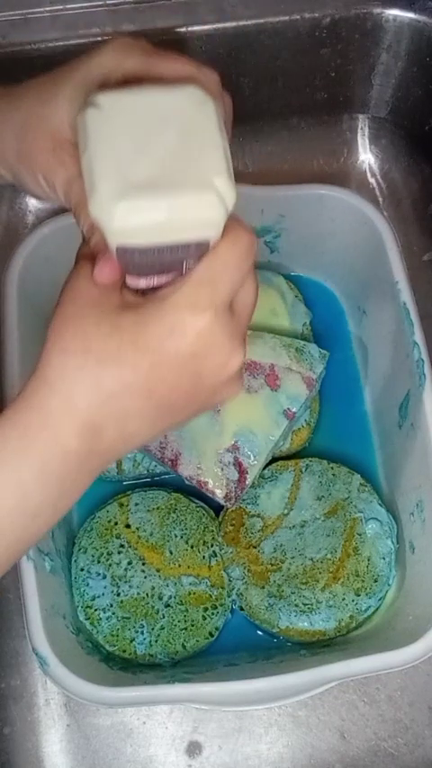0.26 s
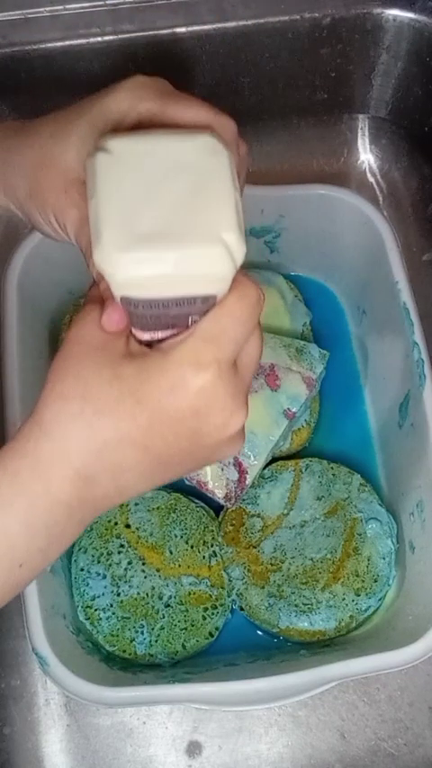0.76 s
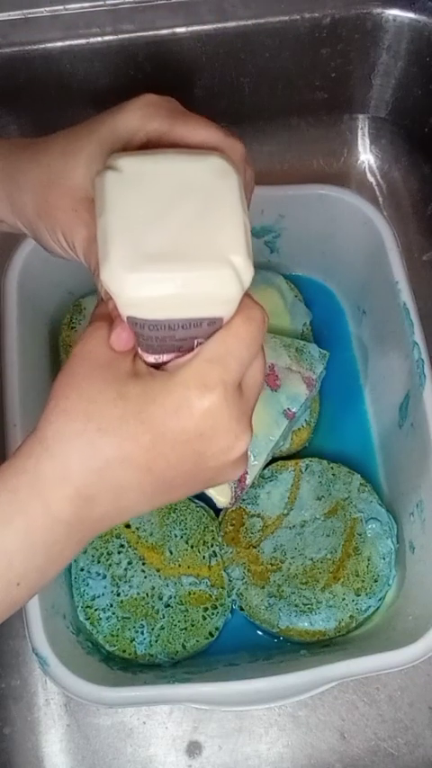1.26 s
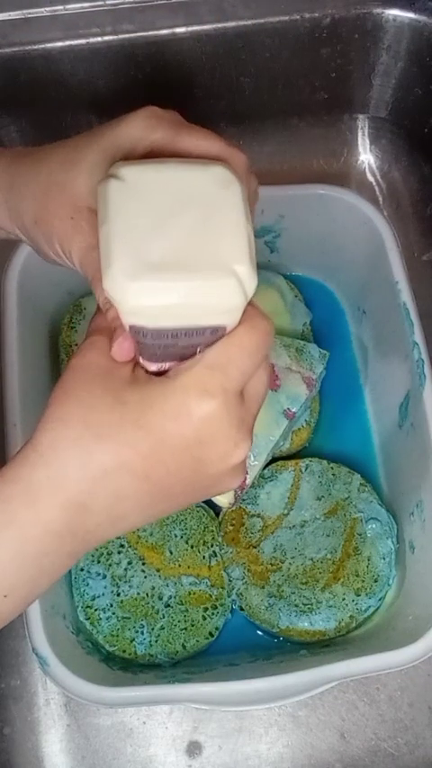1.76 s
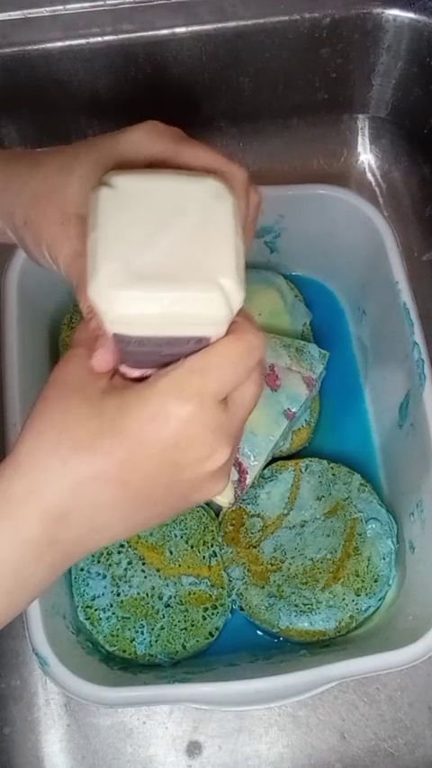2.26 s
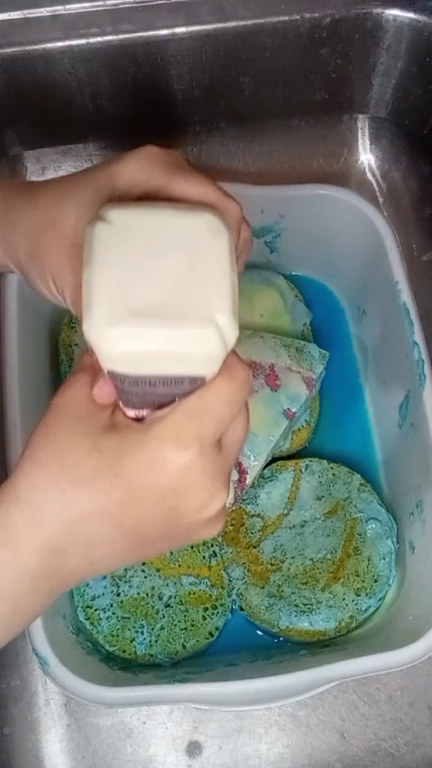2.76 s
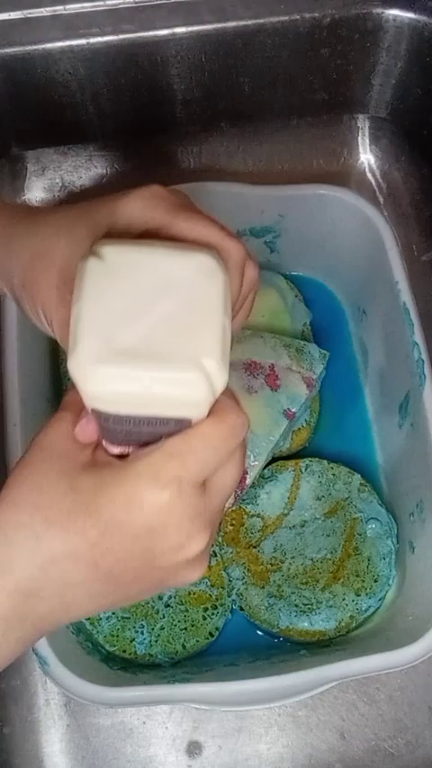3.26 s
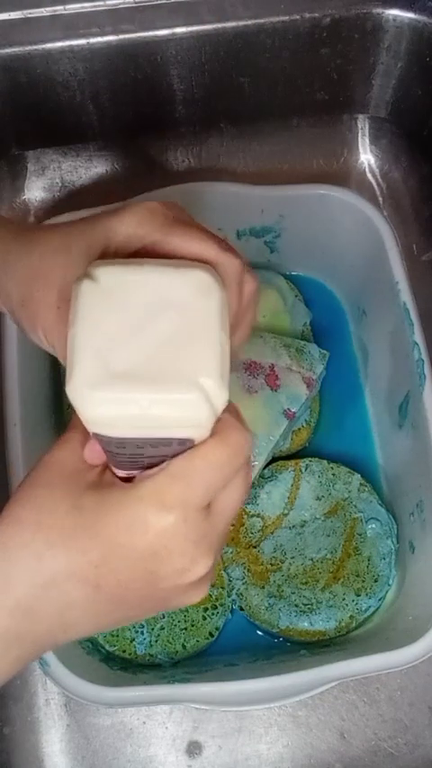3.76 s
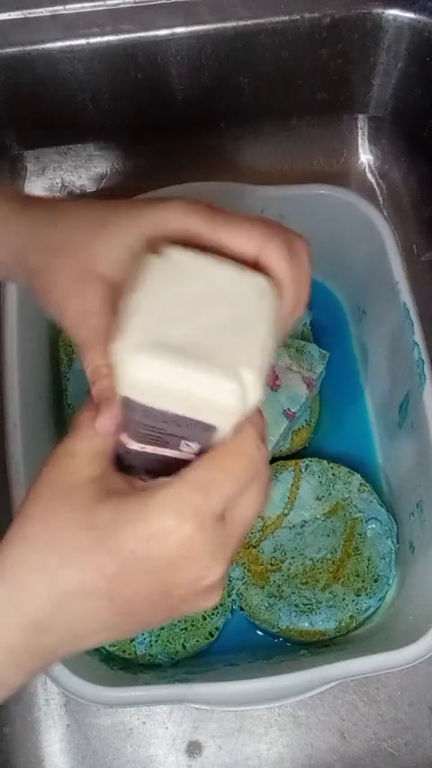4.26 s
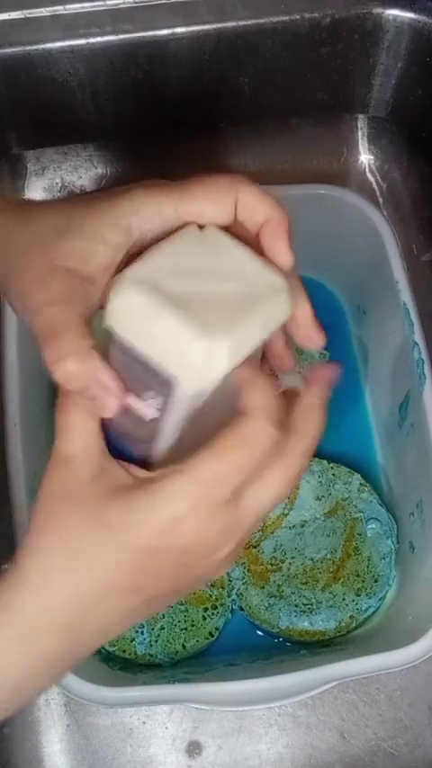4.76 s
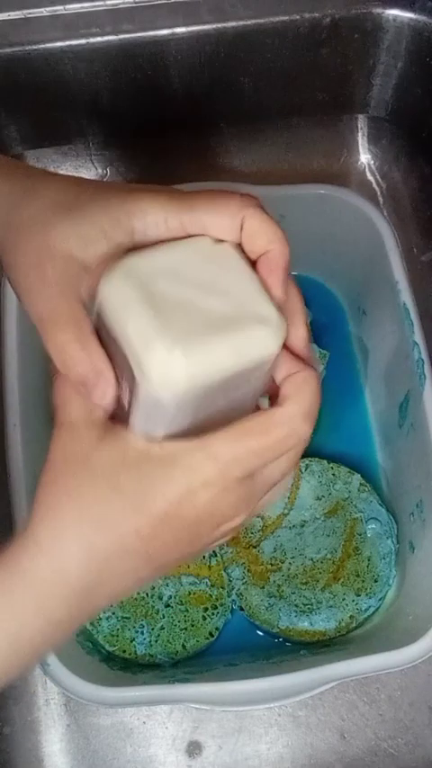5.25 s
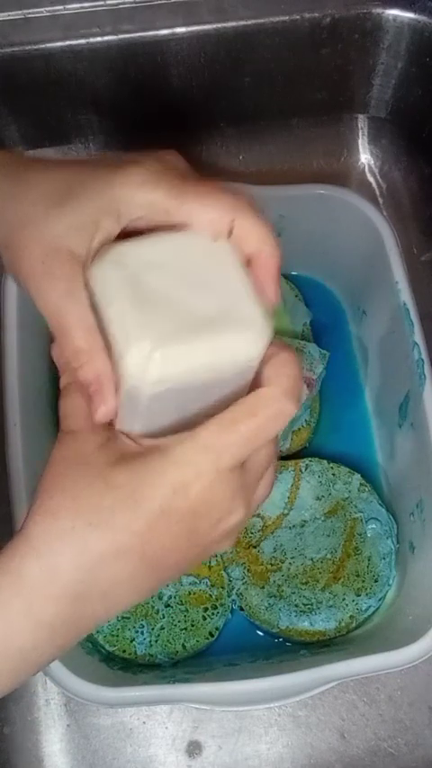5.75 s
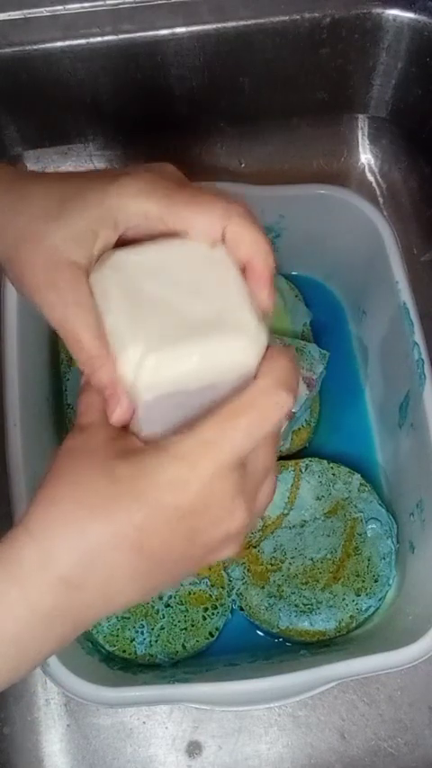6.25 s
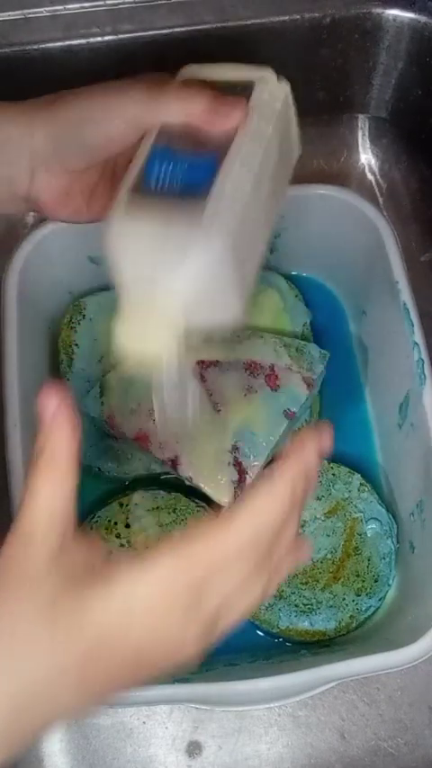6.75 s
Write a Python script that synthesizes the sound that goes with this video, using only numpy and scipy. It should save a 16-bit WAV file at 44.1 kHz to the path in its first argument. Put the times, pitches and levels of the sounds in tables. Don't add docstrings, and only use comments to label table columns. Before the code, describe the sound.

A close stereo microphone hears a soft plastic soap bottle over a tub of wet sponges in a steel sink, in a quiet kitchen. From 0 s a bright, airy nozzle hiss builds, its pitch rising, strongest around 1.3 s, then wavering and sputtering into bubbly froth until about 1.9 s. Hollow low rumbles and soft pops follow as the walls refill, with a very faint thin whistle near 2.1 s. Two quick hissing squirts come at 2.4 and 2.6 s, then more rumbling and wheezy sucked air around 3 s. A softer squirt spits at 3.4 s and fades in frothy dribbles. A dull pop sounds at 4.3 s and a small sharp spit at 4.5 s. Hard plastic pops crack at 5.1-5.3 s and, loudest, 5.5-5.6 s. A last short squirt hisses at 6 s, followed by light flexing and small low knocks until about 7 s.

```python
import sys
import numpy as np
from scipy import signal
from scipy.fft import rfft, irfft, next_fast_len
from scipy.io import wavfile
from scipy.ndimage import uniform_filter1d

SR = 44100
rng = np.random.default_rng(int(sys.argv[2]) if len(sys.argv) > 2 else 0)


def to_wav(s):
    ch = np.atleast_2d(s).T
    pcm = np.round(np.clip(ch, -1, 1) * 32767)
    wavfile.write(sys.argv[1], SR, pcm.astype(np.int16))


def ratio_of_db(decibels):
    return 10 ** (np.asarray(decibels, float) / 20)


N = 307812


def evened(x):
    return x / np.sqrt(np.mean(x ** 2) + 1e-20)


def wander(size):
    return evened(uniform_filter1d(rng.standard_normal(N), size=size))


def read(points, hz):
    f, value = np.transpose(points)
    return np.interp(np.log(hz + 1), np.log(f + 1), value)


def add(mix, s, sound):
    part = mix[round(s * SR):][:len(sound)]
    part += sound[:len(part)]


def power_sum(levels_db):
    return 10 * np.log10(sum(10 ** (np.maximum(db, -150) / 10) for db in levels_db))


def colour(x, gain_db):
    size = next_fast_len(x.shape[-1])
    gain = ratio_of_db(gain_db(np.fft.rfftfreq(size, 1 / SR)))
    return irfft(rfft(x, size) * gain, size)[..., :x.shape[-1]]


def resonate(x, hz, width):
    r = np.exp(-np.pi * width / SR)
    turn = 2 * np.pi * hz / SR
    return signal.lfilter([2 * (1 - r) * np.sin(turn)], [1, -2 * r * np.cos(turn), r * r], x)


def follow(x, hz, width):
    turn = np.exp(2j * np.pi * np.cumsum(hz) / SR)
    r = np.exp(-np.pi * width / SR)
    return 2 * (turn * signal.lfilter([1 - r], [1, -r], x / turn)).real


def turbulence(patchy_db, flicker_db, channels=1):
    frames = N // 128 + 6
    a, b, patches = rng.standard_normal((frames, 257, 3, channels)).T.swapaxes(0, 1)
    patches = uniform_filter1d(uniform_filter1d(patches, size=6, axis=1), size=22, axis=2)
    patches = 2 * np.tanh(evened(patches) / 2)
    flicker = evened(uniform_filter1d(rng.standard_normal(frames), size=4))
    z = (a + 1j * b) * ratio_of_db(patchy_db * patches + flicker_db * flicker)
    return evened(signal.istft(z, nperseg=512, noverlap=384)[1][:, :N])


def nozzle():
    # (frequency [Hz], density [dB per Hz])
    jet_shape = [(1410, -64), (2400, -37), (2720, -16.5), (3220, -11), (3320, -6.5), (3890, -3.5),
                 (4360, -3), (5140, 1), (5550, 2.5), (6740, 1.5), (8200, -20), (10700, -44.5),
                 (18000, -120)]
    breadth_shape = [(740, -31), (1250, -13.5), (1420, -3.5), (1580, -6), (2020, -2.5), (2620, 1.5),
                     (3600, -3.5), (3900, -3.5), (4810, -6.5), (8140, -120)]
    gurgle_shape = [(360, -27.5), (620, -16), (826, -11.5), (1050, -7), (1200, -13), (1350, -11),
                    (1760, -11), (2970, -120)]
    fizz_shape = [(4410, -44.5), (7500, -3.5), (8070, -7.5), (9630, -4), (11800, -9.5), (13400, -9.5),
                  (13800, -6), (14400, -8), (15100, 3.5), (16000, -16)]
    spray_shape = [(13000, -38.5), (14300, -6), (15200, -3.5), (16000, -10.5)]
    # (time [s], pitch [Hz], lift above the hiss [dB])
    singing = [(0, 4600, 3.5), (.5, 5750, -1.5), (.8, 7260, 9), (1.1, 7000, 12), (1.3, 6990, 8),
               (1.5, 6900, 11), (1.9, 6360, 18), (2.4, 6200, 5), (6.98, 6300, -1)]

    t = np.arange(N) / SR
    jet_db, open_db = squeeze()
    fizz_db = -8.5 - 0.0764 * open_db + 1.2 * wander(2500)
    fizz_db += 7 * np.clip(-0.5 + open_db / 12, 0, 1) * wander(500)
    flutter = uniform_filter1d(uniform_filter1d(rng.standard_normal(N), size=600), size=300)
    jet_db = jet_db + 0.9 * evened(flutter)
    gurgle_db = -5.5 + 2 * open_db
    level = ratio_of_db(jet_db + np.array([0 * t, open_db, gurgle_db, fizz_db, 0 * t - 27]))

    size_db = 0.73 * np.minimum(rng.exponential(1, N), 4)
    bursts = rng.random(N) < 900 / SR
    bubbles = evened(bursts * rng.choice([-1, 1], N) * ratio_of_db(size_db))
    air = turbulence(patchy_db=.4, flicker_db=.45)[0] + 0.45 * bubbles
    shapes = (jet_shape, breadth_shape, gurgle_shape, fizz_shape, spray_shape)
    jet, *parts = [evened(colour(air, lambda hz: read(shape, hz))) for shape in shapes]

    s, hz, lift_db = np.transpose(singing)
    song = follow(jet, np.interp(t, s, hz), width=920)
    jet = jet + (ratio_of_db(np.interp(t, s, lift_db)) - 1) * song
    jet /= np.sqrt(uniform_filter1d(jet ** 2, size=12000))
    return (level * [jet, *parts]).sum(0)


def squeeze():
    # (time [s], pressure [dB], nozzle opening [dB])
    long_squeeze = [
        (0, -37.5, -16.5),
        (.3, -34, -14),
        (1.03, -28.5, -13.5),
        (1.2, -29, -12),
        (1.265, -28, -7.5),
        (1.295, -30.5, -8),
        (1.33, -29.5, -5),
        (1.42, -32.5, -4),
        (1.48, -34, -9),
        (1.52, -30.5, -15.5),
    ]
    # (time [s], pressure [dB], nozzle opening [dB])
    sputter = [
        (1.522, -30.5, -8),
        (1.546, -35, -2.5),
        (1.65, -44, 1),
        (1.69, -41.5, -5.5),
        (1.744, -40.5, -2.5),
        (1.807, -41, -6),
        (1.87, -77, 6),
    ]
    # (valve opens [s], peak [s], hand lets go [s], peak level [dB], opening [dB])
    squirts = [
        (2.438, 2.486, 2.647, -31.5, -5.5),
        (2.593, 2.679, 2.668, -32, -2.5),
        (3.396, 3.492, 3.552, -36, -1.5),
        (5.97, 6.066, 6.013, -31.5, -1.5),
    ]
    # (loudest [s], pressure [dB], rise [s], fall [s], opening [dB])
    puffs = [(1.96, -58, 0.26, 0.21, 2), (1.955, -52, 0.027, 0.023, -1.5), (2.17, -78, 0.059, 0.23, -16),
             (2.904, -61, 0.3, 0.084, 6), (3.075, -59, 0.017, 0.17, 0.5), (3.14, -62, 0.16, 0.071, 5),
             (3.713, -54.5, 0.043, 0.14, 7), (3.789, -60.5, 0.61, 0.049, 7),
             (3.414, -45.5, 0.026, 0.052, 7), (4.442, -78, 0.11, 0.11, -12),
             (4.52, -71.5, 0.026, 0.039, -7), (5.197, -60.5, 0.017, 0.15, 4.5),
             (5.267, -61, 0.015, 0.095, 3), (5.505, -67, .05, 0.072, -3), (5.842, -79, 0.057, 0.035, 0.5),
             (5.925, -47, 0.015, 0.11, -1), (5.947, -53.5, 0.039, 0.073, 14),
             (6.297, -67.5, 0.47, 0.049, 7), (6.382, -81, .1, 0.093, -2)]
    valve_s, first_share = 0.012, 0.3
    sag_db_per_s, let_go_db_per_s = 35, 185
    slack_per_db, slackest_db = 0.38, 6.5

    t = np.arange(0, N / SR + .002, .001)
    flows, opens = [], []
    for s, db, rise, fall, open_db in puffs:
        flows.append(db - 30 * np.maximum((s - t) / rise, (t - s) / fall))
        opens.append(open_db + 0 * t)
    for start, top, stop, top_db, open_db in squirts:
        swell = np.interp(t, [start - valve_s, start, top], [1e-3, first_share, 1], 1e-9)
        lost_db = sag_db_per_s * np.maximum(t - top, 0) + let_go_db_per_s * np.maximum(t - stop, 0)
        flows.append(top_db + 20 * np.log10(swell) - lost_db)
        opens.append(np.minimum(open_db + slack_per_db * lost_db, slackest_db))
    s, long_db, open_db = np.transpose(long_squeeze + sputter)
    flows.append(np.interp(t, s, long_db, right=-150))
    opens.append(np.interp(t, s, open_db))

    total_db = power_sum(flows)
    shares = [10 ** ((np.maximum(db, -150) - total_db) / 10) for db in flows]
    mean_open_db = sum(share * opening for share, opening in zip(shares, opens))
    return [np.interp(np.arange(N) / SR, t, curve) for curve in (total_db, mean_open_db)]


def leaks():
    # (start [s], length [s], pitch [Hz], width [Hz], level [dB])
    whistles = [
        (2.139, 0.1, 6470, 118.4, -66.5),
    ]
    out = np.zeros(N)
    for s, length, hz, width, db in whistles:
        t = np.arange(0, length, 1 / SR)
        noise = rng.standard_normal(9000)[:len(t)]
        tone = evened(resonate(resonate(noise, hz, width), hz, width))
        add(out, s, ratio_of_db(db) * np.sin(np.pi * t / length) * tone)
    return out


def pops():
    # (time [s], peak [dB], pitch [Hz], length [cycles], ring [dB])
    dents = [(.05, -54.5, 124.9, 2.6, -10.5), (1.9, -50, 112, 2.2, -8), (6.085, -50.5, 100, 2, -7),
             (2.029, -43.5, 183, 1.2, -1.5), (2.947, -52, 226, 1.3, 1.5), (3.076, -46, 200, 2.2, 1.5),
             (3.294, -41, 143, 1.36, -5.5), (3.804, -50.5, 236, 4.1, -5.5), (3.899, -53.5, 127, 2.6, -9),
             (4.269, -33, 168.5, 1.5, -14), (5.126, -21.5, 230, 1.22, -17), (5.196, -24, 214.5, 1, -10.5),
             (5.256, -25.5, 520, 0.68, 1), (5.262, -33.5, 520, 1.2, 7.5), (5.274, -25.5, 227, 1.6, -13),
             (5.4852, -21.5, 570, 1.7, -7.5), (5.487, -20, 222, 1.2, -13.5), (5.517, -24.5, 480, 1, -8),
             (5.52, -22.5, 160, 1.4, -20), (5.5925, -15.5, 700, 1.96, -11), (5.6, -23.5, 569, 4.4, -10),
             (5.595, -35, 148, 1.7, -13), (5.5923, -31.5, 1130, 2.7, -23), (5.594, -40, 2300, 2.7, -30),
             (6.301, -43.5, 260, 2.5, -11), (6.601, -42.5, 114, 1.34, -4.5), (6.61, -42.5, 115, 1.26, -19)]
    # (frequency [Hz], level [dB], t60 [s])
    ring = [(125.3, 7, 0.13), (200, -13, 0.085), (241, 4.5, 0.12), (417, -20, 0.18), (520, -13.5, 0.22),
            (579.5, -4, 0.087), (697, -13.5, 0.099)]
    out, t = np.zeros(N), np.arange(12000)[:, None] / SR
    modes_hz, modes_db, t60 = np.transpose(ring)
    u = np.arange(-800, 800) / SR
    grips = rng.standard_normal((len(dents), 2, len(ring)))
    for (s, db, hz, cycles, ring_db), (detune, relevel) in zip(dents, grips):
        tuned_hz = modes_hz * (1 + 0.0392 * detune)
        decay = ratio_of_db(modes_db + 2.0 * relevel - 60 * t / t60)
        body = (decay * np.sin(2 * np.pi * tuned_hz * t) * tuned_hz).sum(1) * 1.72 / SR
        flip = np.exp(-(2.64 * u * hz / cycles) ** 2) * np.cos(2 * np.pi * hz * u + 0.34)
        sound = ratio_of_db(ring_db) * signal.fftconvolve(flip, body)
        add(sound, 0, flip)
        add(out, s + u[0], ratio_of_db(db) * sound)
    return out


def spits():
    # (time [s], peak [dB], pitch [Hz], t60 [s])
    froth = [(5.84, -65, 4500, .08), (1.874, -53.5, 2750, 0.037), (1.953, -45, 6300, 0.013),
             (2.434, -39, 6400, 0.12), (2.434, -44, 3000, .08), (3.382, -43, 4460, 0.08),
             (3.382, -48, 2200, .05), (2.912, -60, 5500, .02), (4.211, -57, 700, .04),
             (5.123, -52, 800, .03), (5.191, -52, 800, .04), (5.708, -55, 600, .05), (2.347, -53, 600, .1),
             (4.275, -62, 3570, 0.04), (4.6544, -72, 5500, 0.02), (5.9223, -51, 2240, 0.04),
             (5.924, -50, 5000, .04)]
    # (time [s], peak [dB], pitch [Hz], t60 [s])
    ticks = [(3.022, -66, 9590, 0.03), (3.072, -66, 9800, .04), (3.19, -66, 10000, .015),
             (3.858, -66, 6500, .012), (3.916, -70, 15000, .015), (5.193, -65, 9300, .12),
             (5.264, -64, 9500, .1), (5.5, -72, 9500, .06), (5.526, -70, 11000, .03),
             (5.592, -66, 6000, .015), (5.126, -70, 9500, .015), (3.8581, -62, 11200, 0.01),
             (3.9854, -71, 14000, 0.012), (5.1238, -62, 14800, 0.012), (6.3719, -72, 10060, 0.013),
             (6.5166, -61, 13500, 0.01)]
    # (time [s], peak [dB], pitch [Hz], t60 [s])
    cracks = [
        (4.535, -58, 3100, 0.018),
        (4.533, -43, 5300, 0.035),
        (4.545, -53, 5400, 0.07),
        (5.592, -52, 1250, 0.15),
        (5.592, -56, 2300, 0.03),
        (5.592, -58, 2000, .12),
    ]
    events = froth + ticks + cracks
    out, t = np.zeros(N), np.arange(6000) / SR
    for (s, db, hz, t60), noise in zip(events, rng.standard_normal((len(events), len(t)))):
        puff = evened(colour(noise, lambda f: np.maximum(-70 * np.log2((f + 1) / hz) ** 2, -60)))
        onset = np.minimum(t / 0.00067, 1)
        add(out, s, ratio_of_db(db + 3 - 60 * t / max(t60, .005)) * puff * onset)
    return out


def shaking():
    # (middle [s], length [s], wall rumble [dB], tub drone [dB])
    flexes = [(0, 0.45, -70, -53.5), (0.266, 0.18, -67, -56), (0.472, 0.31, -71.5, -58),
              (0.941, 0.53, -83, -58), (1.433, 0.22, -58, -57.5), (1.75, 0.22, -83, -56.5),
              (1.969, 0.21, -44.5, -53.5), (2.393, 1, -93, -58.5), (2.65, 0.68, -53, -55),
              (2.882, 0.4, -58.5, -48.5), (3.111, 0.29, -42, -53.5), (3.625, 0.62, -53.5, -51.5),
              (3.78, 0.12, -61, -51), (5.241, 0.14, -69, -51), (5.512, 0.12, -55, -74),
              (5.666, 0.33, -59, -55), (5.964, 0.14, -56.5, -49), (6.136, 0.19, -53, -60),
              (6.303, 0.23, -56, -53.5), (6.5, 0.34, -59, -78), (6.822, 0.45, -59.5, -59.5)]
    # (middle [s], length [s], level [dB])
    groans = [
        (0.046, 0.62, -60),
        (0.29, 0.38, -61.5),
        (2.11, 0.17, -70),
        (5.052, 0.14, -64),
        (5.843, 0.27, -61.5),
        (6.944, 0.21, -65),
    ]
    # (frequency [Hz], width [Hz], level [dB])
    wall_modes = [(115, 6.3, 7.5), (200, 51, 22), (284.7, 72, 13.5), (420, 45, -16)]
    drone_modes = [(541, 48, 0.5), (581.3, 57, 2)]
    groan_modes = [(438, 53, 0)]

    def arch(middle, length):
        return -24.5 * (2 * (t - middle) / length) ** 2

    t, out = np.arange(0, N / SR + .01, .005), np.zeros((2, N))
    wall = ratio_of_db(power_sum([-80.5] + [db + arch(s, length) for s, length, db, _ in flexes]))
    drone = ratio_of_db(power_sum([-66] + [db + arch(s, length) for s, length, _, db in flexes]))
    groan = ratio_of_db(power_sum([db + arch(s, length) for s, length, db in groans]))
    for modes, level, apart, lumpy_db in ((wall_modes, wall, .15, 1.5), (drone_modes, drone, .35, 2.5),
                                          (groan_modes, groan, .3, 2.5)):
        common, left, right = rng.standard_normal((3, N))
        drive = ratio_of_db(lumpy_db * wander(900)) * (common + apart * np.array([left, right]))
        tone = sum(ratio_of_db(g) * resonate(resonate(drive, hz, w), hz, w) / np.sqrt(w) for hz, w, g in modes)
        out += np.interp(np.arange(N) / SR, t, level) * evened(tone)
    return out


def tub(x):
    # (frequency [Hz], width [Hz], lift [dB])
    air_modes = [(874, 110, 4.5), (1127, 58, 4), (1460, 60, 4.5), (1718, 85, -4.5), (2170, 89, 3.5),
                 (2698, 90, 0.5), (3150, 170, 1.5), (3890, 89, 4), (4600, 93, 3.5), (5250, 60, 5),
                 (5630, 36, 5), (6380, 90, 0.5)]
    return colour(x, lambda f: sum(db / (1 + (2 * (f - hz) / width) ** 2) for hz, width, db in air_modes))


def sink(x, t60, wet_db, hop):
    padded, out = np.pad(x, (hop, 2 * hop)), np.zeros((2, N + 4 * hop + 9040))
    fade = np.sin(np.pi * np.arange(2 * hop) / (2 * hop))
    for start in range(0, N + hop, hop):
        piece = padded[start:start + 2 * hop] * fade
        part = signal.fftconvolve(piece[None], paths(t60, wet_db), axes=1)
        out[:, start:start + part.shape[1]] += part
    return out[:, hop + 128:hop + 128 + N]


def paths(t60, wet_db):
    at = np.arange(12, 9000, 20) + rng.integers(0, 20, (2, 450))
    taps = np.zeros((2, 9040))
    np.put_along_axis(taps, at, rng.choice([-1., 1.], at.shape), 1)
    taps *= ratio_of_db(-60 * np.arange(9040) / SR / t60)
    taps *= ratio_of_db(wet_db) / np.linalg.norm(taps, axis=1, keepdims=True)
    taps[0, 0] = taps[1, 4] = 1
    comb = rfft(taps, 16384)
    broad = np.sqrt(uniform_filter1d(abs(comb) ** 2, size=28, axis=1))
    return np.roll(irfft(comb / broad), 128, axis=1)[:, :9040]


def kitchen():
    # (frequency [Hz], density [dB per Hz])
    room = [(24, -47), (40, -5), (85, -17), (108, -5.5), (216, -11), (257, -12.5), (431, -13), (512, -16.5),
            (571, -12.5), (693, -14.5), (1650, -23.5), (2280, -26), (3510, -29.5), (5290, -32.5),
            (7000, -35), (9100, -77), (15400, -120)]
    # (frequency [Hz], left-right likeness [0-1])
    likeness = [(60, 0.72), (180, 0.91), (550, 0.16), (1650, 0), (4970, 0.35), (15000, 0.019)]
    # (frequency [Hz], width [Hz], level [dB])
    whine_bands = [(1740, 65, -77), (2300, 49, -79.5), (5220, 70, -81)]

    def same(hz):
        return np.clip(read(likeness, hz), .01, .99)

    common, other = turbulence(patchy_db=3.5, flicker_db=1.0, channels=2)
    right = colour(common, lambda hz: 20 * np.log10(same(hz)))
    right = right + colour(other, lambda hz: 10 * np.log10(1 - same(hz) ** 2))
    hum = evened(colour(np.array([common, right]), lambda hz: read(room, hz)))
    whines = sum(ratio_of_db(db) * evened(resonate(rng.standard_normal((2, N)), hz, width))
                 for hz, width, db in whine_bands)
    return ratio_of_db(-62) * hum + whines


def scene():
    hop = 9000
    hiss = ratio_of_db(1.5) * sink(tub(nozzle()) + leaks(), t60=0.051, wet_db=4.0, hop=hop // 2)
    hiss += signal.oaconvolve(spits()[None], paths(t60=.03, wet_db=-2), axes=1)[:, 128:128 + N]
    knocks = sink(pops(), t60=0.29, wet_db=-7.5, hop=hop)
    knocks = signal.sosfilt(signal.butter(2, 65, "high", fs=SR, output="sos"), knocks)
    return hiss + knocks * ratio_of_db(np.array([[-.3], [.3]])) + shaking() + kitchen()


def low_pass(x):
    return signal.sosfilt(signal.butter(12, 17100, fs=SR, output="sos"), x)


def record(dry):
    # (frequency [Hz], gain on the ports' difference [dB])
    bass_side = [(60, -4.5), (130, -4.5), (250, -0.5), (600, 1.5), (1200, -1)]
    # (frequency [Hz], left minus right [dB])
    port_tilt = [(60, 0.5), (99, 2.5), (160, -3), (270, -3), (450, 3.5), (740, -1.5), (1220, 1.5),
                 (2010, -1), (3330, 1.5), (5500, -5.5), (9080, 16), (15000, 5.5)]
    # (frequency [Hz], density [dB per Hz])
    self_noise = [(4120, -33.5), (7000, -18.5), (8090, -2.5), (8830, -8), (12600, -6), (13500, -19),
                  (14300, -5.5), (15100, -3), (16000, -8.5)]
    side = (dry[0] - dry[1]) / 2
    dry = dry + np.array([[1], [-1]]) * (colour(side, lambda hz: read(bass_side, hz)) - side)
    left = colour(dry[0], lambda hz: .5 * read(port_tilt, hz))
    right = colour(dry[1], lambda hz: -.5 * read(port_tilt, hz))
    low_cut = signal.butter(3, 63.4, "high", fs=SR, output="sos")
    ports = signal.sosfilt(low_cut, np.array([left, right]))
    hiss = evened(colour(rng.standard_normal((2, N)), lambda hz: read(self_noise, hz)))
    ports = ports + ratio_of_db(-80.5) * hiss
    band_limit = signal.firwin(511, 15800, window=("kaiser", 9), fs=SR)
    limited = signal.oaconvolve(ports, band_limit[None], "same")
    return low_pass(limited)


dry = scene()
out = record(dry)
to_wav(out)
```